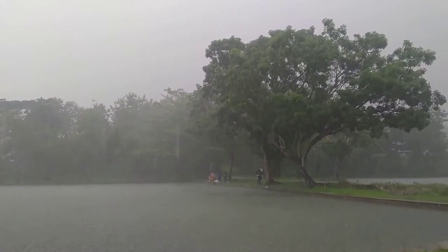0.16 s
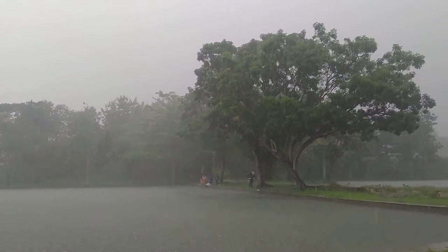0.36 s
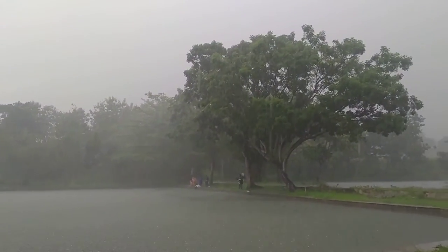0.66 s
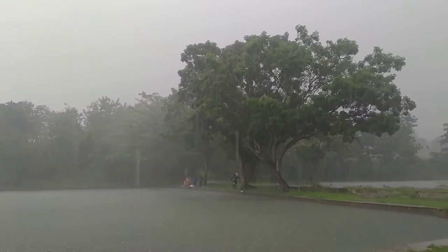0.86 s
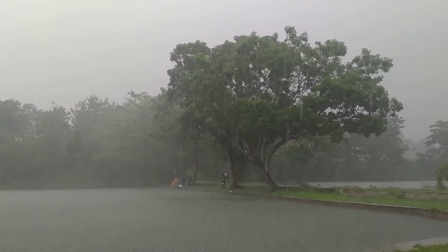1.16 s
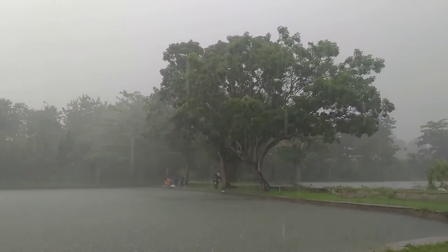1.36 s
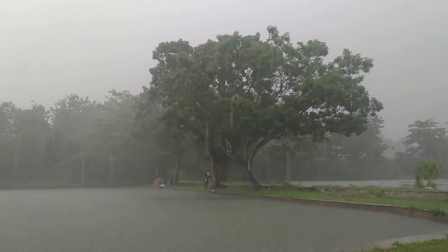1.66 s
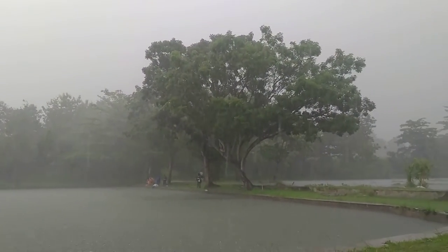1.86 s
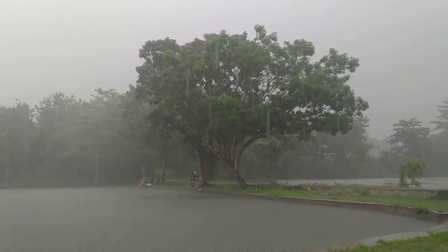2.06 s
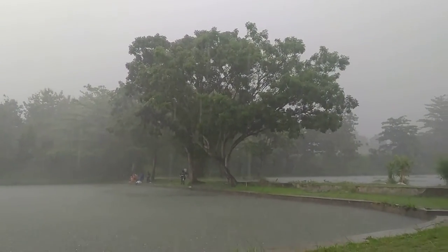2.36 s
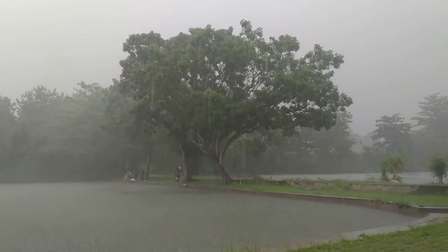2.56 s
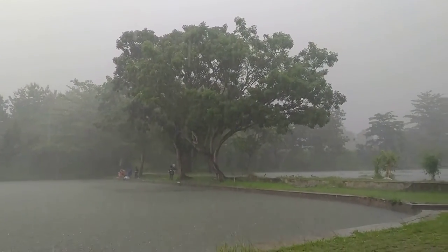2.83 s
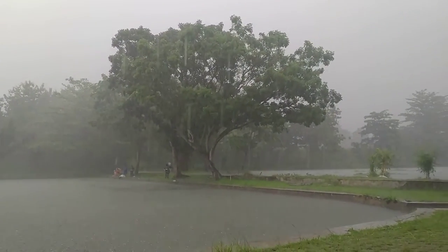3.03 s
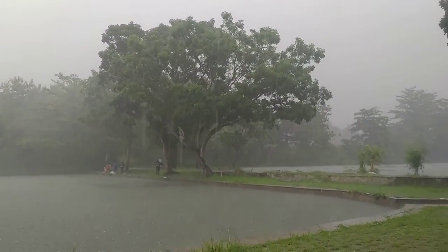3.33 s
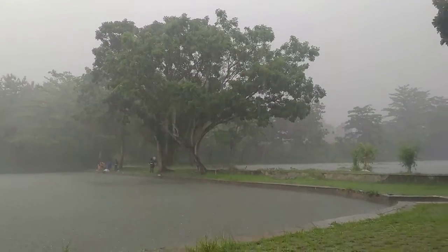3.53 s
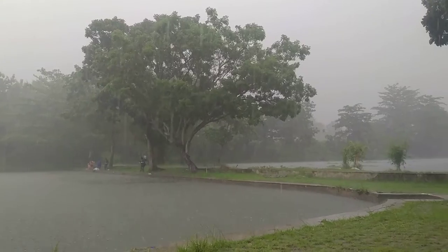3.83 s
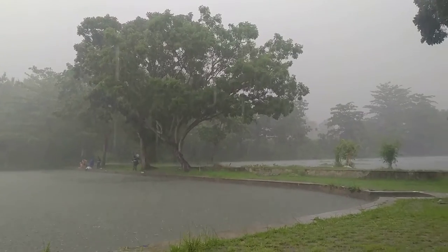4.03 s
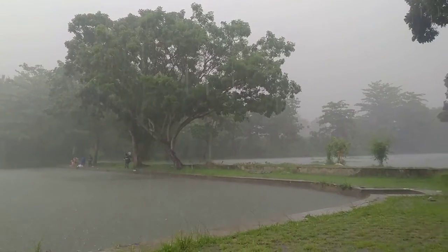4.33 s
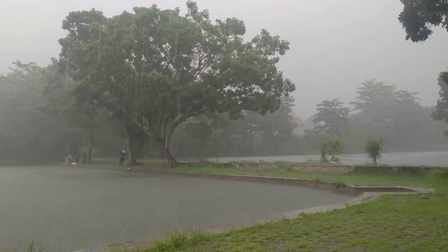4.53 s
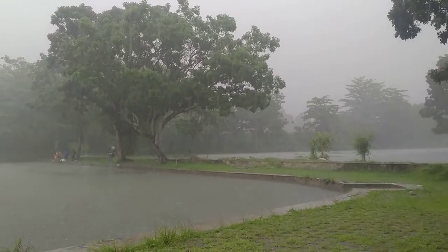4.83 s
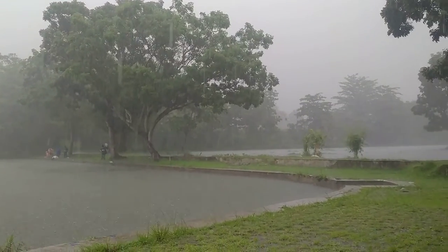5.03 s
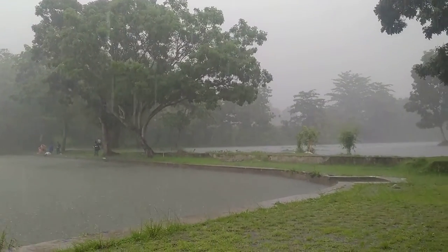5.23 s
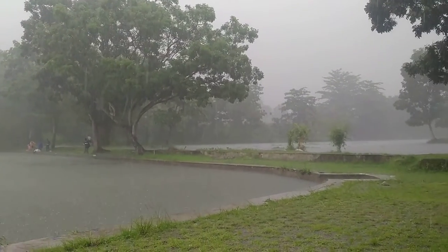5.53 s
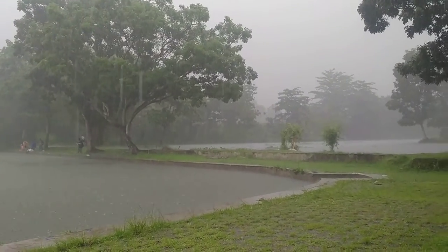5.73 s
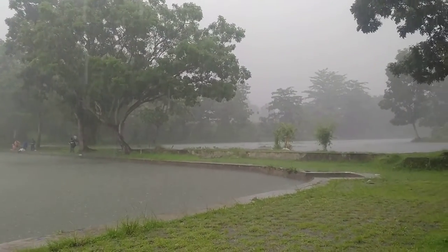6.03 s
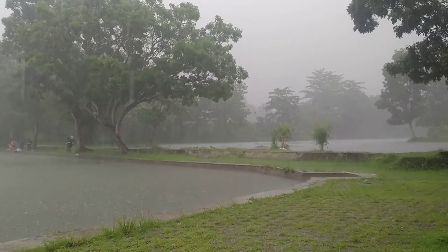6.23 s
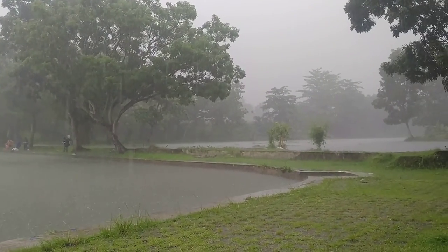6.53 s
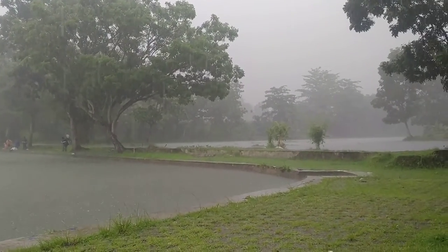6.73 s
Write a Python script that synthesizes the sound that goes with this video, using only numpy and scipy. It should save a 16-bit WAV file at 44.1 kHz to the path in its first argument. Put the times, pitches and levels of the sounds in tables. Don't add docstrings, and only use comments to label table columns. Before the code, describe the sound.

A dense, unbroken downpour on open water, softly swelling with gusts, while close drops tick, tap and occasionally plop nearby.

```python
import sys
import numpy as np
from scipy import signal
from scipy.fft import rfft, irfft, next_fast_len
from scipy.io import wavfile
from scipy.ndimage import uniform_filter1d

SR = 44100
rng = np.random.default_rng(int(sys.argv[2]) if len(sys.argv) > 2 else 0)


def gain_from_decibels(decibels):
    exponent = np.asarray(decibels, float) / 20
    return 10 ** exponent


def bounce(signal):
    frames = np.transpose(np.atleast_2d(signal))
    limited = np.clip(frames, -1, 1)
    pcm = np.round(limited * 32767).astype(np.int16)
    wavfile.write(sys.argv[1], SR, pcm)


N = 303834
SIZE = next_fast_len(N)
HZ = np.fft.rfftfreq(SIZE, 1 / SR)
STOP_S = 6.8335

# pitch_hz, level_db (per Hz)
POND_COLOUR = [(25, -44.6), (45, -39.5), (95, -9), (120, -6), (230, -8), (325, -8.5), (480, -6.5),
               (1000, -4.5), (1570, -3.5), (2350, -0.5), (2750, -1.93), (3400, -10), (5100, -25.5),
               (7000, -42)]
# pitch_hz, level_db (per Hz)
GRASS_COLOUR = [(3500, -25), (5100, -7.5), (5700, -5.5), (6200, -3), (7000, -3), (7550, -0.8), (8400, 1),
                (8900, -2), (9600, -7.5), (10600, -10.5), (12000, -12.5), (13600, -16.5), (14500, -14.5),
                (15300, -9.5)]
# start_s, peak_db, centre_hz
LEAF_TICKS = [(0.3861, -32, 12800), (0.4642, -34, 12700), (0.7365, -33, 11900), (0.84, -35, 14500),
              (1.0504, -32, 12900), (1.2391, -34, 11300), (1.5489, -35, 12400), (1.7204, -35, 13300),
              (1.7447, -36, 11400), (1.9154, -28, 12500), (2.4193, -36, 12000), (2.4943, -33, 14200),
              (3.3766, -31, 13100), (3.6173, -33, 11300), (3.7124, -38, 11900), (3.8883, -35, 10900),
              (4.2337, -27, 12400), (4.3057, -29, 13600), (4.6958, -31, 12100), (4.7013, -34, 10600),
              (4.9298, -29, 13300), (5.0944, -36, 11900), (5.156, -29, 10600), (5.6098, -36, 11500),
              (5.8382, -32, 12500), (5.8468, -35, 14100), (6.1526, -35.5, 11100), (6.2338, -34, 11800),
              (6.2766, -37, 13100), (6.5816, -35, 11000)]
# start_s, peak_db, centre_hz
DULL_TAPS = [(0.3539, -36, 6240), (0.3898, -27, 8500), (0.9721, -28, 8400), (1.0512, -28, 8300),
             (1.5408, -24, 8300), (1.7237, -28, 8100), (2.0009, -24, 8700), (2.0639, -24, 8500),
             (2.4195, -27, 6100), (2.6897, -29, 8500), (3.0878, -29, 8700), (3.1323, -33, 7000),
             (3.8929, -31, 8500), (4.5469, -30, 7600), (4.5861, -28, 7100), (4.7009, -28, 7400),
             (4.9302, -33, 8700), (4.946, -33, 6200), (5.2743, -25.5, 8200), (5.3965, -32, 7300),
             (5.6254, -28, 8400), (5.6956, -27, 7900), (6.153, -29, 8000), (6.2341, -28, 8500),
             (6.2412, -25.5, 8400), (6.3584, -28, 7600), (6.7881, -31, 7800)]
# start_s, peak_db, bubble_hz
PUDDLE_PLOPS = [
    (1.329, -21, 953),
    (1.939, -17.5, 1440),
    (3.983, -16, 826),
    (5.332, -17, 1270),
]
# time_s, level_db
RAIN_GUSTS = [(0.1, -27.5), (0.6, -27.5), (1.05, -27.5), (1.35, -26), (1.6, -27), (1.95, -27), (2.35, -28),
              (2.95, -27), (3.55, -28), (4.15, -27), (4.5, -28), (5.05, -28), (5.35, -25.7), (5.8, -26.1),
              (6.05, -27.5), (6.4, -26.9), (6.65, -25), (6.78, -25.8)]
# gust_share (0-1), turn_change_db, wander_db
POND_BANDS = [
    (0.66, -0.55, 0.5),
    (0.57, -0.6, 0.47),
    (1.0, 0.45, 0.33),
    (.6, -0.15, 0.4),
]
# gust_share (0-1), turn_change_db, wander_db
GRASS_BANDS = [
    (.6, -1.6, .4),
    (0.81, 1.5, 0.29),
    (0.71, -2.1, .35),
]

TURN_AT_S, TURN_TAKES_S = 5.27, 0.66


def evened(x):
    return x / np.sqrt(np.mean(x ** 2) + 1e-20)


def filtered(x, gain):
    return irfft(rfft(x, SIZE) * gain, SIZE)[..., :N]


def bell(hz, width_hz, db):
    return gain_from_decibels(db * np.exp(-0.5 * ((HZ - hz) / width_hz) ** 2))


def coloured(x, points):
    hz, db = np.transpose(points)
    return filtered(x, gain_from_decibels(np.interp(np.log(HZ + 1), np.log(hz + 1), db)))


def band(x, low_hz, high_hz, width_octaves=0.15):
    def edge(hz):
        return 0.5 + 0.5 * np.tanh(np.log2((HZ + 1) / hz) / width_octaves)
    return filtered(x, edge(low_hz) - edge(high_hz))


def wander(top_hz, count=24):
    t = np.arange(0, N + 256, 256) / SR
    total = np.zeros(len(t))
    for hz in np.geomspace(top_hz / 8, top_hz, count):
        total += np.sin(2 * np.pi * (hz * t + rng.random())) / hz ** 0.25
    return np.interp(np.arange(N) / SR, t, evened(total))


def gusty(x, rows, splits_hz):
    t = np.arange(N) / SR
    out = np.zeros(N)
    gust_db = np.interp(t, *np.transpose(RAIN_GUSTS))
    gust_db = gust_db - gust_db.mean()
    turn = np.clip((t - TURN_AT_S) / TURN_TAKES_S, 0, 1)
    lows_hz, highs_hz = [1, *splits_hz], [*splits_hz, 4 * SR]
    for (share, turn_db, wander_db), low_hz, high_hz in zip(rows, lows_hz, highs_hz):
        level_db = share * gust_db + turn_db * turn + wander_db * wander(top_hz=6.5)
        out += band(x, low_hz, high_hz) * gain_from_decibels(level_db)
    return out


def far_rain(patchy_db, flicker_db):
    frames = N // 128 + 5
    real, imaginary, patches = rng.standard_normal((frames, 257, 3)).T
    patches = uniform_filter1d(patches, size=6, axis=0)
    patches = evened(uniform_filter1d(patches, size=14, axis=1))
    flicker = evened(uniform_filter1d(rng.standard_normal(frames), size=5))
    field = (real + 1j * imaginary) * gain_from_decibels(patchy_db * patches + flicker_db * flicker)
    return evened(signal.istft(field, nperseg=512, noverlap=384)[1][:N])


def splat(hz, cycles):
    u = np.arange(round(4 * cycles * SR / hz) + 8) * hz / SR / cycles
    grain = u * np.exp(-2 * u) * np.sin(2 * np.pi * cycles * u)
    return grain / abs(grain).max()


def patter(low_hz, high_hz, per_s, cycles, spread_db, count=24):
    out = np.zeros(N)
    for hz in np.geomspace(low_hz, high_hz, count):
        lands = rng.random(N) < per_s / count / SR
        size = gain_from_decibels(spread_db * np.minimum(rng.exponential(1, N), 5)) * lands
        out += signal.oaconvolve(size, splat(hz, cycles) * hz)[:N]
    return evened(out)


def grass():
    wash = far_rain(patchy_db=0.05, flicker_db=0.5)
    crackle = patter(4800, 15800, per_s=1200, cycles=1.3, spread_db=3.7)
    drops = wash + gain_from_decibels(-10) * crackle
    fizz = gain_from_decibels(-43.0) * evened(coloured(drops, GRASS_COLOUR))
    return gusty(fizz, GRASS_BANDS, splits_hz=[7100, 9100])


def faint(per_s, db, spread_db, low_hz, high_hz, count=150):
    gap, size, pitch = rng.random((count, 3)).T
    start_s = np.cumsum(-np.log(1 - gap)) / per_s
    peak_db = db + 2 * spread_db * (2 * size - 1)
    rows = np.transpose([start_s, peak_db, low_hz + (high_hz - low_hz) * pitch])
    return list(rows[start_s < STOP_S])


def scatter(grit, burst_db, burst_s, spray_db, spray_s):
    t = np.arange(len(grit)) / SR
    burst = gain_from_decibels(burst_db) * np.exp(-t / burst_s)
    spray = gain_from_decibels(spray_db) * np.exp(-t / spray_s)
    tail = grit * (burst + spray)
    tail[0] = 1
    return tail


def add(mix, start_s, sound):
    part = mix[round(start_s * SR):][:len(sound)]
    part += sound[:len(part)]


def close_drops():
    out = np.zeros(N)
    ticks = LEAF_TICKS + faint(per_s=17, db=-39, spread_db=0, low_hz=10200, high_hz=13202)
    taps = DULL_TAPS + faint(per_s=6.5, db=-35, spread_db=3, low_hz=7000, high_hz=8702)
    kinds = [(ticks, 1.1, -3.2), (taps, 2.6, -3.3), (PUDDLE_PLOPS, 1.8, -5.6)]  # drops, cycles, trim_db
    noises = rng.standard_normal((3, 200, 800))
    for noise, (table, cycles, trim_db) in zip(noises, kinds):
        for grit, (start_s, db, hz) in zip(noise, table):
            tail = scatter(grit, burst_db=-12.5, burst_s=0.00055, spray_db=-26.5, spray_s=0.008)
            splash = np.convolve(splat(hz, cycles), tail)
            add(out, start_s, gain_from_decibels(db + trim_db) * splash)
    return filtered(out, bell(15500, width_hz=1300, db=7))


def pond():
    wash = far_rain(patchy_db=0.32, flicker_db=0.61)
    near = patter(487, 4625, per_s=3000, cycles=2.1, spread_db=1.84)
    drops = wash + gain_from_decibels(-10.5) * near
    roar = gain_from_decibels(-27.0) * evened(coloured(drops, POND_COLOUR))
    return gusty(roar, POND_BANDS, splits_hz=[1020, 1670, 2820])


def scene():
    return (pond() + grass() + close_drops())[None]


def low_pass(x):
    return signal.sosfilt(signal.butter(12, 17060, fs=SR, output="sos"), x)


def record(dry):
    dipped = filtered(dry, bell(7890, width_hz=65, db=-11))
    stopped = dipped * (np.arange(N) < STOP_S * SR)
    edge = signal.firwin(numtaps=3001, cutoff=15735, window=("kaiser", 10), fs=SR)
    return low_pass(signal.oaconvolve(stopped, edge[None], "same"))


dry = scene()
out = record(dry)
bounce(out)
```